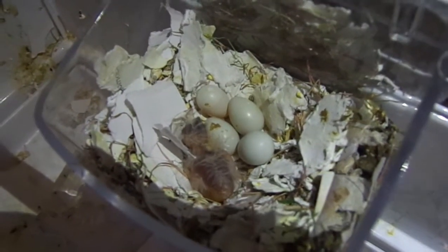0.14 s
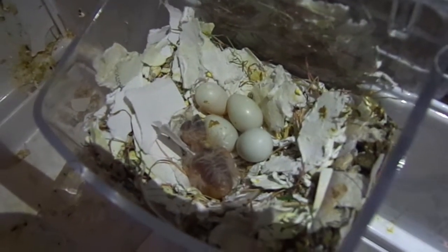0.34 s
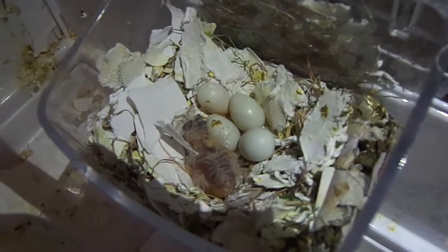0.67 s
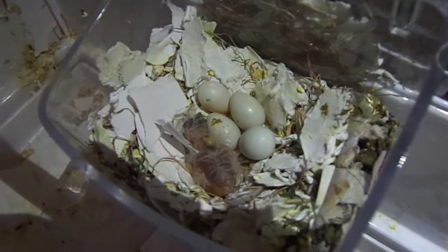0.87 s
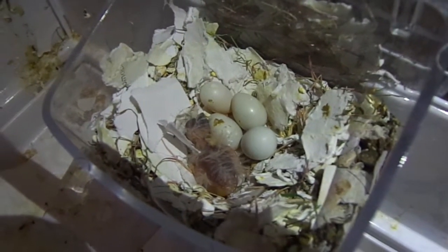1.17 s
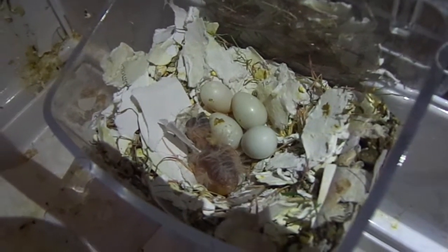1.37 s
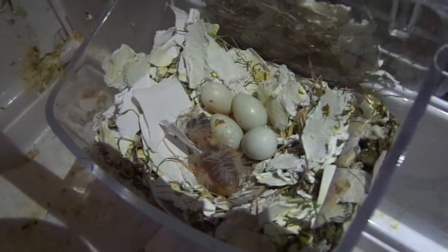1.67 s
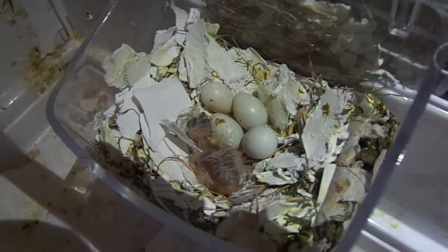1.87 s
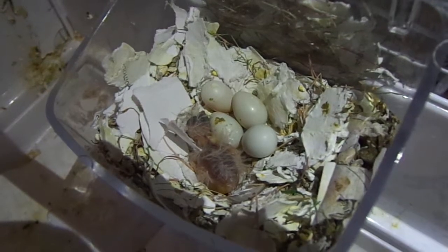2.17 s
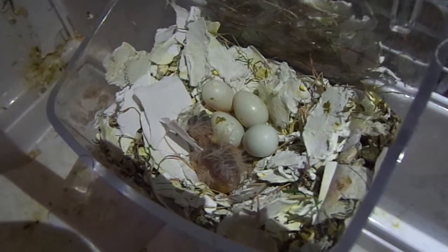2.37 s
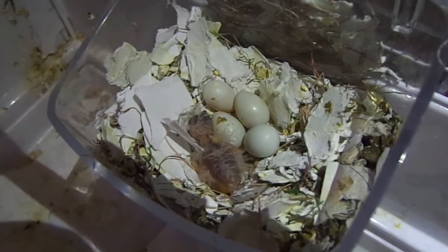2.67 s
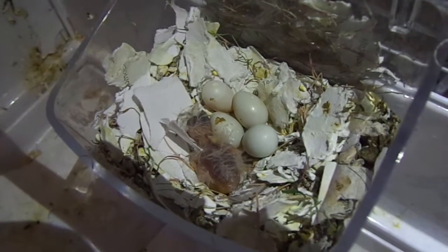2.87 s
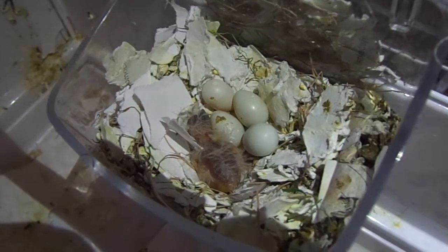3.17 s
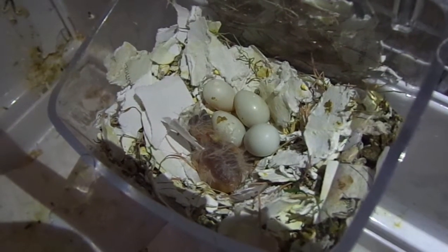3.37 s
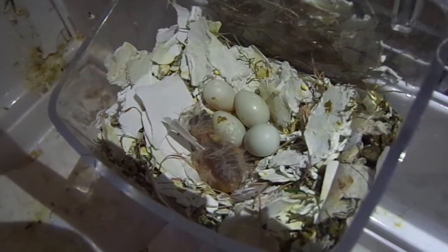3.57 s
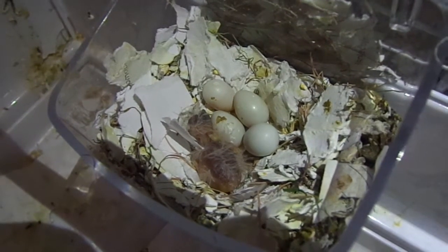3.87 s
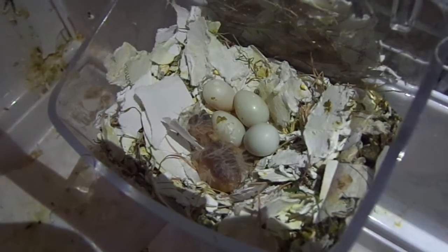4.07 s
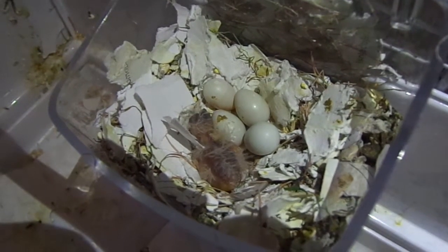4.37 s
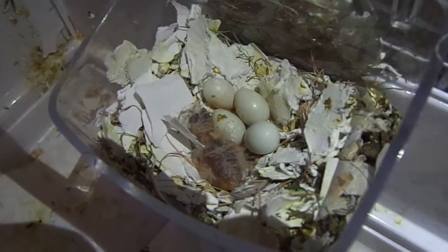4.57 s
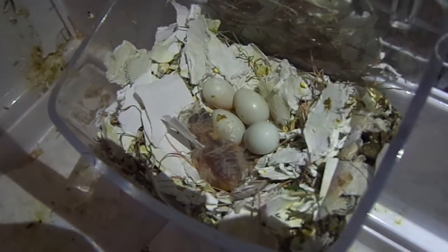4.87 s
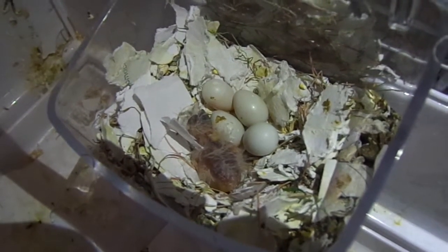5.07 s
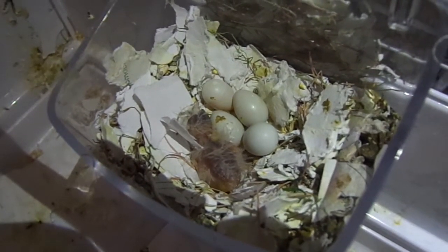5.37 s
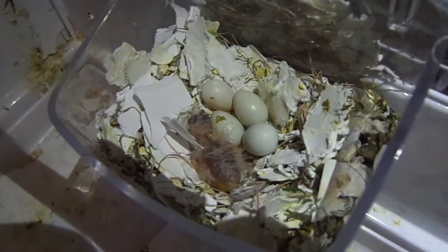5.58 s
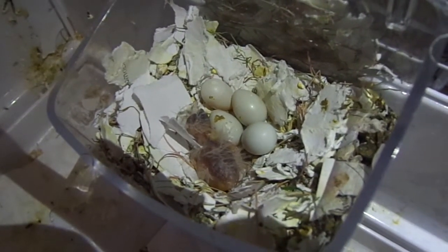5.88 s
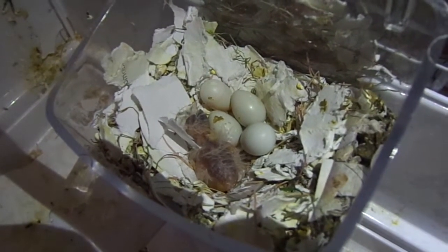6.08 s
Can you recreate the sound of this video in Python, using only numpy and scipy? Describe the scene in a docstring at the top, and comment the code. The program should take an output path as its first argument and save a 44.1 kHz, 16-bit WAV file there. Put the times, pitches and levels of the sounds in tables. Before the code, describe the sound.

Quiet indoor room noise, a soft airy hiss with barely audible tones, runs throughout. At 0.3 s there is a faint dull knock. A tiny hoarse nasal call at 1.2 s precedes a soft wing rustle with light claw ticks at 1.3 s, answered by a sharper hop at 1.53 s. Another flutter with taps comes at 2.4 s, a small knock at 2.47 s, then at 2.6 s one short, ragged rasping call, about a tenth of a second, breaking and sinking. A soft nasal peep at 3.37 s leads into a light rustle at 3.43 s; a stronger tap and flutter follows at 3.68 s. A barely audible call at 4.03 s and a tiny tick at 4.29 s precede the final pair: a bright, clicking hop at 4.6 s and a feathery rustle at 4.9 s. Everything rings briefly, close and thin, in the cage.

```python
"""Finches in an indoor cage

A zebra finch hops to and fro: claws tap and wings rustle, mostly in quick pairs.
Taps and rustles are bursts of noise that ring the cage; bands of noise add colour to them.
Soft nasal calls and one rasping call are streams of pulses and noise, coloured by resonances.
Small knocks are short fading bursts of noise, each through one broad resonance.
Quiet room noise, hiss and faint tones lie under it all.
"""
import sys
import numpy as np
from scipy import signal
from scipy.fft import rfft, irfft
from scipy.io import wavfile

SR = 44100
rng = np.random.default_rng(int(sys.argv[2]) if len(sys.argv) > 2 else 0)


def materialize(psi):
    """Save the field psi as 16-bit PCM at rate SR to the path in sys.argv[1].

    A 1-D psi becomes a single channel; in a 2-D psi each row is a channel.
    """
    bounded = np.clip(np.atleast_2d(psi).T, -1, 1)
    quanta = np.round(bounded * 32767).astype(np.int16)
    wavfile.write(sys.argv[1], SR, quanta)


N = 275184  # length in samples
T = np.arange(N) / SR  # time of every sample, s
F = np.maximum(np.fft.rfftfreq(N, 1 / SR), 1)  # frequencies of the spectrum, Hz
TOP_HZ = 15060  # upper edge of the sound


def undb(db):
    """Turn decibels into gain."""
    return 10 ** (np.asarray(db) / 20)


def unit(x):
    """Scale to an rms (average strength) of 1."""
    return x / np.sqrt(np.mean(x ** 2))


def colour(points):
    """Draw a gain for every frequency through (Hz, dB) points."""
    hz, db = np.transpose(points)
    return undb(np.interp(np.log(F), np.log(hz), db))


def bell(hz, width_hz):
    """Give the gain of one resonance at every frequency, 1 at its centre."""
    return 1 / np.sqrt(1 + ((F ** 2 - hz ** 2) / (F * width_hz)) ** 2)


def shape(x, gain):
    """Filter a sound by a gain for each frequency."""
    return irfft(rfft(x) * gain, N)


def response(gain, size=4096):
    """Turn a gain curve into the ringing that follows one click, with energy 1."""
    cepstrum = irfft(np.log(gain + 1e-5), N)
    # keeping only the first half makes the ringing start at the click, never before it
    h = irfft(np.exp(rfft(2 * cepstrum * (T < T[-1] / 2))), N)[:size]
    return h / np.linalg.norm(h)


def ring(x, h):
    """Let a sound set off the ringing h."""
    return signal.fftconvolve(x, h)[:N]


def curves(rows):
    """Draw each column of a table as a line over time; the first column is the time."""
    s, *columns = np.transpose(rows)
    return [np.interp(T, s, c) for c in columns]


def wander(rate):
    """Drift at random with a spread near 1, through `rate` new points per second."""
    count = int(T[-1] * rate) + 2
    return 1.2 * np.interp(T * rate, np.arange(count), rng.standard_normal(count))


def progress(start_s, length_s):
    """Stay at 0 before an event and rise evenly to 1 at its end."""
    return np.clip((T - start_s) / length_s, 0, 1)


def envelope(start_s, rise_s, hold_s, fall_s):
    """Stay full through the hold; be 30 dB down one rise before it and one fall after it."""
    outside = np.maximum((start_s - T) / rise_s, (T - start_s - hold_s) / fall_s)
    return undb(-30 * np.clip(outside, 0, 8))


def pulses(hz):
    """Make one click per cycle, shared between neighbouring samples, with rms 1."""
    cycles = np.cumsum(hz) / SR
    samples_off = np.abs(cycles - np.round(cycles)) * SR / hz
    return unit(np.maximum(1 - samples_off, 0) - hz / SR)


def swish(centre_hz, width_hz):
    """Move a steep-sided band of noise, rms 1, along a changing centre frequency."""
    spread = shape(rng.standard_normal(N), 1 / (1 + (F / width_hz) ** 3))
    return unit(spread * np.sin(2 * np.pi * np.cumsum(centre_hz) / SR))


# balance of the room noise: pitch_hz, density_db (relative, per Hz)
ROOM_COLOUR = [(15, -26), (25, -13), (121, -8.5), (154, -8.5), (243, -5), (271, -4.5), (293, -4),
               (404, -7.5), (573, -3), (769, -4.5), (833, -6.5), (1030, -5.5), (1420, -5.5), (3180, -12.5),
               (15000, -17)]
# broad resonances that lift the room noise: pitch_hz, width_hz, lift_db
ROOM_RESONANCES = [(84, 6.7, 0), (130.3, 23, 5.5), (540, 60, 1.5), (852, 42, 5), (967, 60, 4.5),
                   (1424, 24, 6)]
# faint tones: pitch_hz (middle of a small drift), level_db (before hum_db is added)
ROOM_TONES = [(845.2, -72), (12258, -81)]
ROOM_DB = -58.5  # rms of the steady noise


def room(swell_db=0.92, swell_hz=2500, hum_db=-4):
    """Air noise with broad resonances: its lower part swells gently, its hiss stays even; tones drift."""
    gain = colour(ROOM_COLOUR)
    for hz, width_hz, db in ROOM_RESONANCES:
        gain = gain * undb(db * bell(hz, width_hz) ** 2)
    noise = undb(ROOM_DB) * unit(shape(rng.standard_normal(N), gain))
    low_air = shape(noise, 1 / (1 + (F / swell_hz) ** 2))
    swelling = low_air * (undb(swell_db * wander(rate=6.8)) - 1)
    hum = np.zeros(N)
    for hz, db in ROOM_TONES:
        drifting_hz = hz + 2.49 * wander(rate=12)
        hum += np.sqrt(2) * undb(db) * np.sin(2 * np.pi * np.cumsum(drifting_hz) / SR)
    return noise + swelling + undb(hum_db) * hum


# small knocks and ticks: start_s, peak_db, pitch_hz (centre), width_hz,
# t60_s (time for the noise that drives it to fall by 60 dB)
SMALL_KNOCKS = [(.298, -47, 860, 450, .38), (.299, -53.5, 276, 120, 0.39), (2.465, -34, 2600, 2200, 0.051),
                (3.657, -39.5, 1720, 900, 0.021), (3.668, -41, 1700, 700, 0.043),
                (4.285, -36.5, 3300, 1900, .007), (4.601, -41.5, 1660, 700, 0.024),
                (4.845, -44, 1600, 650, 0.022)]


def knocks():
    """Light contacts, each a fading burst of noise heard through one broad resonance."""
    out = np.zeros(N)
    for s, db, hz, width_hz, t60 in SMALL_KNOCKS:
        fade = np.exp(-np.log(1000) * np.abs(T - s) / t60)
        push = rng.standard_normal(N) * (T >= s) * fade
        body = shape(push, bell(hz, width_hz) ** 2)
        out += undb(db) * body / np.abs(body).max()
    return out


# resonances of the cage: pitch_hz, width_hz (before widen), level_db (before the bass cut and notch)
CAGE_RESONANCES = [(983, 49, -5), (1465, 29, -8.5), (1704, 81, -10), (2365, 130, -9), (3034, 100, -11),
                   (3415, 43, -11.5), (3840, 60, -13), (4910, 106, -3), (5300, 85, -6), (5750, 28, 1.5),
                   (5600, 41, -6), (6000, 51, -4.5), (6350, 120, 5), (6700, 60, -1.5), (7170, 41, -14),
                   (7340, 260, -4), (7900, 28, -4), (8000, 91, -7), (8640, 38, -9), (8900, 160, -6),
                   (9480, 110, -8.5), (9660, 36, -13), (10350, 130, -7), (11300, 120, -15.5),
                   (11340, 46, -7), (12050, 170, -11), (13100, 56, -28), (13800, 82, -18), (14700, 66, -16)]


def cage_colour(widen=0.92, between_db=-18, low_hz=680, notch_hz=4370, notch_width_hz=220, notch_db=-11):
    """Narrow resonances of the cage over a flat direct sound, with one notch and little bass."""
    power = undb(between_db) ** 2
    for hz, width_hz, db in CAGE_RESONANCES:
        power = power + (undb(db) * bell(hz, widen * width_hz)) ** 2
    bass_cut = 1 / (1 + (low_hz / F) ** 6)  # small birds make little bass
    notch = undb(notch_db * bell(notch_hz, notch_width_hz) ** 2)
    return np.sqrt(power * bass_cut) * notch


def registers(cage, split_hz=4400, upper_hz=8500):
    """Split the cage's ringing into a low, a middle and a high register."""
    low, under, top = (1 / (1 + (F / hz) ** 30) for hz in (split_hz, upper_hz, TOP_HZ))
    shares = [low, under * (1 - low), top * (1 - under)]
    return [response(cage * np.sqrt(share)) for share in shares]


# nasal calls: start_s, length_s, pitch_hz (before the waver), level_db (before throat and bass cut),
# hoarseness (noise against pulses)
SOFT_CALLS = [(1.217, 0.013, 455, -53, 0.83), (3.370, .058, 465, -45, 0.17), (4.027, 0.018, 459, -54, 0.63)]
# resonances of the nasal calls: pitch_hz, width_hz, level_db (relative)
NASAL_RESONANCES = [(974, 270, -2.5), (1760, 170, -6.5), (2345, 140, 2.5), (2850, 220, -8.5),
                    (3210, 160, -4.5), (3700, 350, -8.5), (4400, 400, -10.5), (4900, 250, -14),
                    (7450, 3900, -22)]
SOFT_RISE_S, SOFT_FALL_S = 0.013, 0.019  # time to rise or fall by 30 dB
# pitch waver in each call: share of the pitch, turns per call, place of the crest (0-1)
WAVER, WAVER_TURNS, WAVER_CREST = .028, 1.35, .58


def soft_calls(low_hz=720):
    """Nasal notes: pulses and breath ring narrow resonances, with a weak fundamental."""
    jitter = 1 + .004 * wander(rate=300)
    air, source = rng.standard_normal(N), np.zeros(N)
    for s, length_s, hz, db, hoarse in SOFT_CALLS:
        turns = WAVER_TURNS * (progress(s, length_s) - WAVER_CREST)
        arch = 1 + WAVER * np.cos(2 * np.pi * turns)
        loudness = undb(db) * envelope(s, SOFT_RISE_S, length_s, SOFT_FALL_S)
        source += loudness * (pulses(hz * arch * jitter) + hoarse * air)
    t = T[:2048]
    throat = np.zeros(len(t))
    for k, (hz, width_hz, db) in enumerate(NASAL_RESONANCES):
        mode = np.exp(-np.pi * width_hz * t) * np.sin(2 * np.pi * hz * t)
        throat += (-1) ** k * undb(db) * width_hz * mode
    notes = ring(source, throat / np.linalg.norm(throat))
    return shape(notes, 1 / np.sqrt(1 + (low_hz / F) ** 4))


# the voice breaks once, then sinks: time_s, pitch_hz (before jitter), roughness (0-1)
RASP_VOICE = [(2.604, 965, 0.4), (2.621, 769, 0.78), (2.637, 997, 0.2), (2.662, 817, 0.55),
              (2.70, 790, 0.83)]
# colour of the throat: pitch_hz, level_db (relative)
THROAT_COLOUR = [(300, -24), (700, -4.5), (1000, 0), (1400, 0.5), (3000, -0.5), (4100, -4), (4900, -17),
                 (6600, -24), (7700, -3.5), (9000, -8.5), (15000, -10)]
# start, length, level at the start, and fade by the end (ever faster)
RASP_S, RASP_LENGTH_S, RASP_DB, RASP_FADE_DB = 2.591, 0.12, -38.5, 15.5
# the beak's resonance shut and open, the wait and the time to open
BEAK_SHUT_HZ, BEAK_OPEN_HZ, BEAK_WAIT_S, BEAK_OPENS_S = 3890, 5840, .019, 0.068


def rasping_call(cage, jitter=.14, beak_width_hz=430, cage_share=0.61, beak_db=0.5, opening_db=-8,
                 beak_cage_share=0.57, rise_s=0.0018, fall_s=.02):
    """Ragged pulses mixed with noise; one resonance climbs and weakens as the beak opens."""
    hz, rough = curves(RASP_VOICE)
    rough = np.clip(rough, 0, 1)
    buzz = pulses(hz * (1 + jitter * rough * wander(rate=900)))
    source = np.sqrt(1 - rough) * buzz + np.sqrt(rough) * rng.standard_normal(N)
    fade_db = RASP_FADE_DB * progress(RASP_S, RASP_LENGTH_S) ** 2
    effort = envelope(RASP_S, rise_s, RASP_LENGTH_S, fall_s) * undb(RASP_DB - fade_db)
    opening = progress(RASP_S + BEAK_WAIT_S, BEAK_OPENS_S)
    beak_hz = BEAK_SHUT_HZ + (BEAK_OPEN_HZ - BEAK_SHUT_HZ) * opening
    beak = undb(beak_db + opening_db * np.sqrt(opening)) * swish(beak_hz, beak_width_hz)
    voice = ring(source * effort, response(colour(THROAT_COLOUR) * cage ** cage_share))
    return voice + ring(effort * beak, response(cage ** beak_cage_share))


# bands of noise within the rustles, one click and the rasp's onset:
# start_s, length_s, level_db (at the crest), first_hz, last_hz
NOISE_BANDS = [(1.309, 0.028, -47, 8030, 6600), (1.33, 0.065, -51, 4950, 6030),
               (1.343, 0.025, -46, 13800, 12000), (1.53, 0.039, -38.5, 5650, 5750),
               (1.533, 0.019, -41, 10300, 9840), (1.530, 0.039, -45, 1940, 1713),
               (2.387, .064, -43, 5580, 5820), (2.593, 0.011, -38, 7470, 7550),
               (3.68, .05, -46, 1894, 1390), (4.6255, .005, -25, 7420, 7300),
               (4.66, 0.031, -37.5, 5730, 5880), (4.896, .043, -38, 7700, 7380),
               (4.944, 0.047, -39, 10400, 9600)]
BAND_WIDTH = 0.072  # share of the first frequency


def noise_bands():
    """Noise bands that colour the rustles, one click and the rasp's onset: each swells, fades and may glide."""
    out = np.zeros(N)
    for s, length_s, db, first_hz, last_hz in NOISE_BANDS:
        along = progress(s, length_s)
        swell = np.sqrt(4 * along * (1 - along))
        centre_hz = first_hz + (last_hz - first_hz) * along
        out += undb(db) * swell * swish(centre_hz, BAND_WIDTH * first_hz)
    return out


# claw taps: start_s, rise_s, low_db, middle_db, high_db (levels before gain_db)
CLAW_TAPS = [(1.309, 0.00081, -45.5, -50, -40), (1.353, 0.00061, -42, -42, -40),
             (1.400, 0.00085, -43, -52, -64), (1.529, .001, -34.5, -30.5, -48),
             (1.554, .0014, -32, -36, -46), (1.558, 0.00073, -37, -22.5, -41),
             (2.375, .0006, -42, -38, -41), (2.381, 0.00071, -38.5, -39, -46),
             (2.398, 0.001, -36.5, -36, -49), (2.43, 0.00049, -36, -38, -46), (2.609, .0008, -42, -45, -41),
             (3.43, .0006, -40, -46, -38), (3.481, 0.00075, -42.5, -44, -44), (3.501, .0006, -48, -50, -53),
             (3.680, 0.00081, -39, -30.5, -35), (3.685, 0.00084, -34.5, -28.5, -30),
             (3.728, 0.0012, -37.5, -33.5, -44), (4.625, 0.00074, -35.5, -29, -30.5),
             (4.654, 0.00091, -44, -32, -35), (4.685, 0.00069, -43, -30, -37),
             (4.895, 0.00055, -55, -49, -38.5), (4.919, .0006, -41, -35, -45)]


def claws(bands, gain_db=2):
    """Each tap on the perch is a very short scratch of noise that rings the cage."""
    t = T[:1500]
    out = np.zeros(N)
    for s, rise_s, *dbs in CLAW_TAPS:
        scratch = t / rise_s * np.exp(1 - t / rise_s)
        for db, h in zip(dbs, bands):
            tap = signal.fftconvolve(scratch * rng.standard_normal(len(t)), h)
            tap *= np.linalg.norm(scratch) / np.linalg.norm(tap)  # ringing keeps the scratch's energy
            first = int(s * SR)
            out[first:first + len(tap)] += undb(db) * tap
    return undb(gain_db) * out


# wing rustles: start_s, rise_s, hold_s, level_db (mid-hold, before gain_db), swell_db (over the hold),
# low_db (low swish, relative), high_db (fine feather hiss, relative)
WING_RUSTLES = [(1.313, 0.025, 0.057, -45.5, -1, -1, -3), (1.529, .003, 0.04, -43.5, -5, -3.5, 1),
                (2.374, .003, 0.068, -43, 4.5, -2.5, -1), (3.430, 0.0033, 0.094, -44, -4.5, -5, -2.5),
                (3.677, 0.004, 0.071, -40, -6.5, -5.5, 0), (4.627, 0.012, 0.061, -38.5, 5, -2.5, -1),
                (4.904, 0.026, 0.07, -38.5, -2.5, -2.5, -2)]
RUSTLE_FALL_S = 0.052  # the wings fold: time to fall by 30 dB


def wings(bands, grain_db=3, gain_db=-2):
    """Feathers slide over each other: dense, grainy noise rings the cage in three registers."""
    levels = np.zeros((3, N))
    for s, rise_s, hold_s, db, swell_db, low_db, high_db in WING_RUSTLES:
        swelling_db = db + swell_db * (progress(s, hold_s) - .5)
        stroke = envelope(s, rise_s, hold_s, RUSTLE_FALL_S) * undb(swelling_db)
        levels += np.outer(undb([low_db, 0, high_db]), stroke)
    spurts = undb(wander(rate=200) + grain_db * wander(rate=5000))
    out = np.zeros(N)
    for level, h in zip(levels, bands):
        grains = unit(spurts * rng.standard_normal(N))
        out += ring(grains * level, h)
    return undb(gain_db) * out


def reflections(x, t60, wet_db, gap_s=0.00262):
    """Nearby walls add a short, dense tail that falls by 60 dB in t60 seconds."""
    t = T[:SR // 2]
    tail = rng.standard_normal(len(t)) * np.exp(-np.log(1000) * t / t60) * (t > gap_s)
    return x + undb(wet_db) * ring(x, tail / np.linalg.norm(tail))


def scene():
    """Mix everything alike into both channels; the calls are drier than the movements."""
    cage = cage_colour()
    bands = registers(cage)
    moves = reflections(wings(bands) + claws(bands) + noise_bands(), t60=0.14, wet_db=-10.5)
    voices = reflections(soft_calls() + rasping_call(cage), t60=.14, wet_db=-15)
    return np.tile(moves + voices + knocks() + room(), (2, 1))


def record(dry, side_db=-29, side_hiss_db=-27, offset=-0.00057):
    """Make the two channels differ by a trace, cut the top steeply and sit slightly off zero."""
    scatter = rng.standard_normal(256)
    side = undb(side_db) * ring(dry[0], scatter / np.linalg.norm(scatter))
    hiss = unit(shape(rng.standard_normal(N), colour(ROOM_COLOUR)))
    side += undb(side_hiss_db + ROOM_DB) * hiss
    top_cut = signal.ellip(12, .1, 70, TOP_HZ, fs=SR, output="sos")
    return offset + signal.sosfilt(top_cut, dry + np.array([side, -side]))


dry = scene()
out = record(dry)
materialize(out)
```